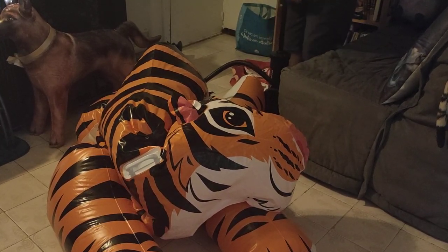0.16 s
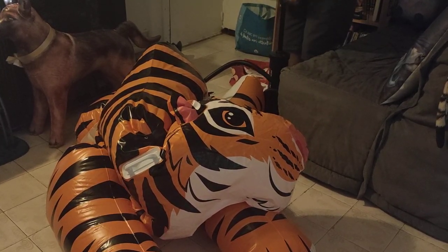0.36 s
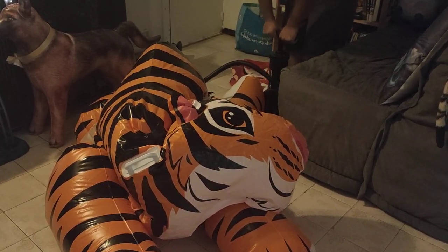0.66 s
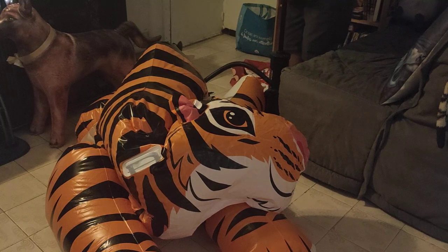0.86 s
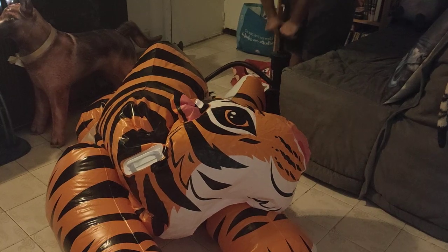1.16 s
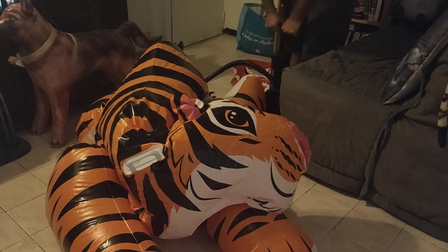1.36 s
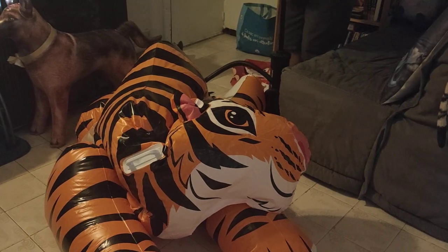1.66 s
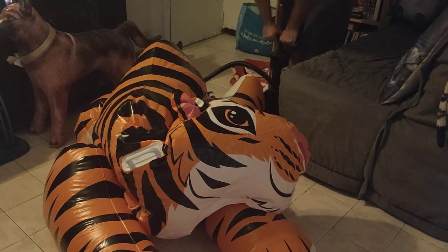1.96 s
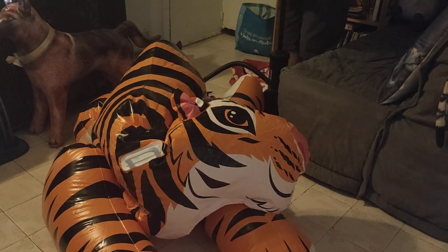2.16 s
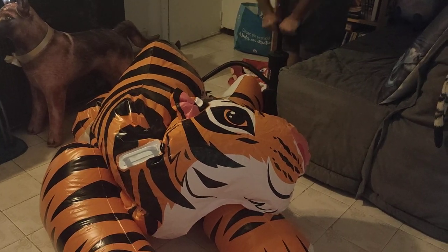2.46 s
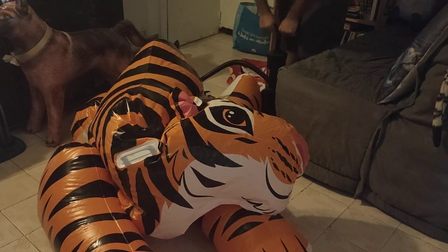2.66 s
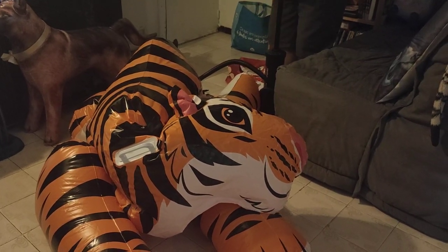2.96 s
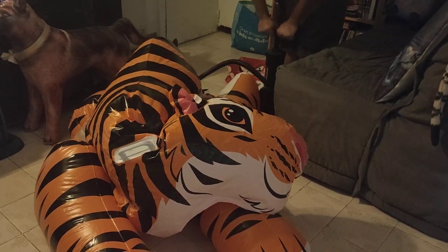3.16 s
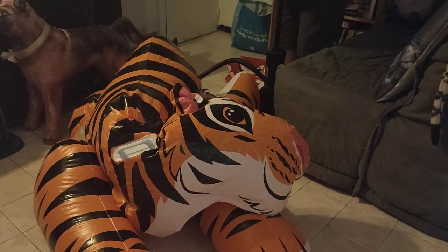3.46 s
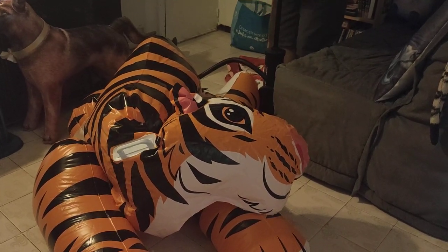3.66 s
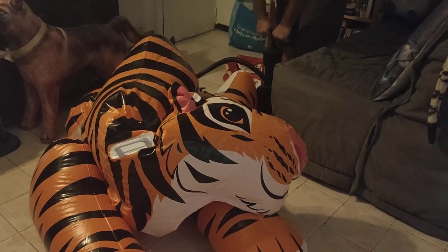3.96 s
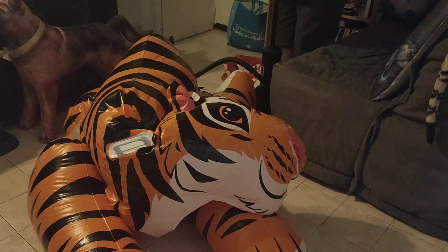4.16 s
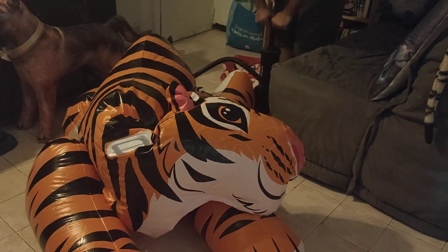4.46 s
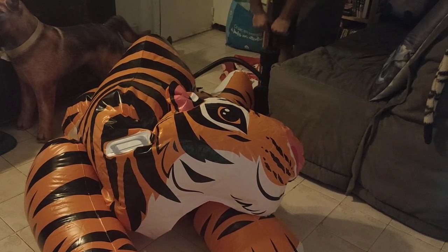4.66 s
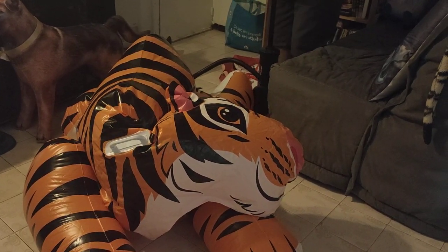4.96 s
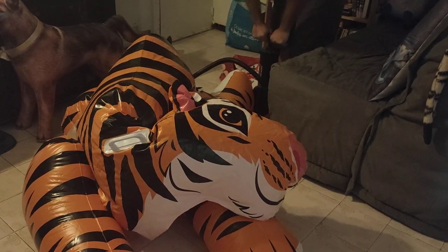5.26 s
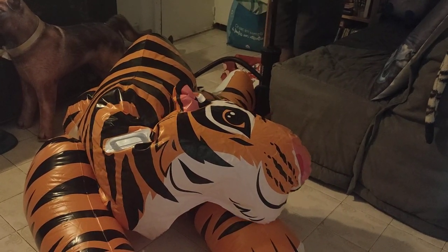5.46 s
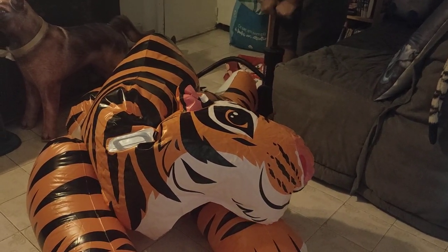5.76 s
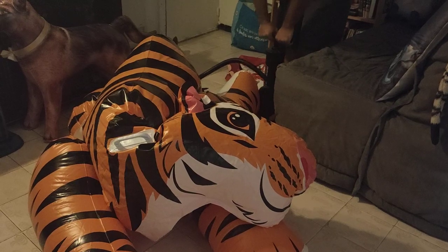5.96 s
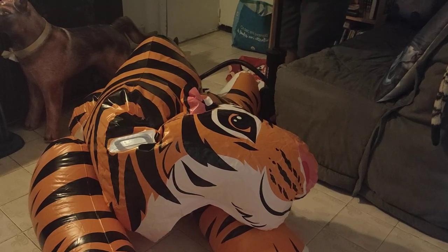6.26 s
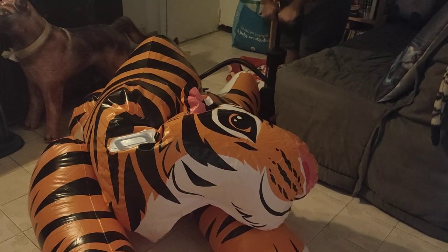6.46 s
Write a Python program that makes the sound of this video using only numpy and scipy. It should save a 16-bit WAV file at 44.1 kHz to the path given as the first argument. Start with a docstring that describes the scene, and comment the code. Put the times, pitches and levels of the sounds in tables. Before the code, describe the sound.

Inside a small tiled room with faint, steady air noise, a double-action hand pump blows up a large vinyl pool toy. The sound opens mid-push, with a weaker pull from about 0.1 s. New pushes follow at about 0.4, 1.1, 1.7, 2.4, 3.0, 3.7, 4.4, 5.0, 5.7 and 6.4 s, each lasting a little under half a second, the last cut off at the end. Every push starts with a small grainy plastic scuff, swells into bright, rasping hiss with hollow hose resonance, and finishes with a soft, dull bump. Pulls between them are quieter and breathier, with a thin airy near-whistle at their fastest, clearest around 0.9 s. In both directions a fluttering valve gives a hoarse, wavering mid-pitched hoot, slightly flat at first, then closes. The rhythm stays even; stereo pickup is close, with short room reflections.

```python
"""A small tiled room, its air faintly audible throughout, heard on two microphone ports: a double-action floor pump
fills a vinyl pool toy at about one and a half full strokes a second, from mid-push to a last push cut off by the end.
Each push starts with a grainy scuff of the shaft; air noise swells through barrel and hose and a fluttering valve flap
hoots hoarsely until it shuts; a damped low sine is the soft bump of the piston at the bottom.
Each pull then rushes more weakly, with the hoot again and a breathy near-whistle of filtered noise at its fastest."""
import sys
import numpy as np
from scipy import signal
from scipy.fft import rfft, irfft
from scipy.io import wavfile

SR = 44100
rng = np.random.default_rng(int(sys.argv[2]) if len(sys.argv) > 2 else 0)


def transcribe(u):
    """Save the signal u as a 16-bit wav file named by the first command-line argument.

    u: samples, shape (n,) or (channels, n), limited to [-1, 1]; the rate is SR.
    q: integer samples, one column per channel.
    """
    v = np.clip(np.atleast_2d(u).T, -1, 1)
    q = np.round(v * 32767).astype(np.int16)
    wavfile.write(sys.argv[1], SR, q)


N = 291501
T = np.arange(N) / SR
FREQS = np.maximum(np.arange(N // 2 + 1) * SR / N, 1)
LEFT_RIGHT = np.array([[1], [-1]])  # signs that set the two ports apart

# handle pushed down: start t/s, length t/s, peak flow level/dB, scuff at the top relative level/dB,
# bump at the bottom relative level/dB
PUSH_STROKES = [(-.27, 0.44, -21, -40, -42), (0.381, 0.45, -21, -36.5, -45), (1.061, 0.43, -21, -47, -44),
                (1.726, 0.43, -20.5, -44, -44), (2.369, 0.43, -21, -38, -47),
                (3.03, .44, -21, -38.5, -43.5), (3.713, 0.43, -21.5, -51, -49),
                (4.368, 0.44, -21, -39.5, -45), (5.033, 0.44, -21, -37.5, -43),
                (5.708, .449, -21, -40.5, -44), (6.396, 0.41, -21.5, -41.5, -45)]
# handle pulled up: start t/s, length t/s, peak flow level/dB, intake whistle level/dB
PULL_STROKES = [(0.071, 0.442, -25.5, -36), (.740, 0.3925, -26, -29), (1.416, 0.411, -26.5, -33.5),
                (2.070, 0.411, -26, -41), (2.719, 0.417, -26, -32.5), (3.384, 0.406, -26.5, -41),
                (4.075, 0.397, -26, -35), (4.736, 0.39, -25.5, -38), (5.395, 0.43, -26, -37),
                (6.079, .41, -26.5, -37)]


def undb(db):
    """Decibels to gain."""
    return 10 ** (np.asarray(db) / 20)


def unit(x):
    """Scale to rms 1."""
    return x / np.sqrt(np.mean(x ** 2))


def across(hz, values):
    """Join points by straight lines along log frequency."""
    return np.interp(np.log(FREQS), np.log(hz), values)


def shape(x, gain):
    """Filter by a gain for each frequency."""
    return irfft(rfft(x) * gain, N)


def walk(rate_hz):
    """Smooth random motion with rms 1, fading out above rate_hz."""
    return unit(shape(rng.standard_normal(N), np.exp(-(FREQS / rate_hz) ** 2)))


def ring(hz, width_hz):
    """Response of one resonance, gain 1 at its centre."""
    return 1 / (1 + 1j * (FREQS ** 2 - hz ** 2) / (FREQS * width_hz))


def diffuse(apart_hz=800):
    """Noise from all round a room: nearly alike at both ports in the bass, mostly unrelated in the treble."""
    mid, side = rng.standard_normal((2, N))
    apart = 0.005 + 0.75 * (1 - np.exp(-(FREQS / apart_hz) ** 2))
    common = shape(mid, np.sqrt(1 - apart / 2))
    opposed = shape(side, np.sqrt(apart / 2))
    return common + opposed * LEFT_RIGHT


def swell(start, length, power, skew):
    """The piston speeds up and slows down in one smooth arc, 0 to 1 to 0; a skew under 1 peaks early."""
    done = np.clip((T - start) / length, 0, 1)
    return np.abs(np.sin(np.pi * done ** skew)) ** power


def flow(strokes, power, skew, room_t60_s=0.926, room_db=-13):
    """Rush level in dB for one direction: a swell for each stroke, its energy dying away in the room."""
    energy = sum((undb(db) * swell(start, length, power, skew)) ** 2 for start, length, db, *_ in strokes)
    keep = undb(-60 / (room_t60_s * SR)) ** 2  # energy left after one sample
    lingering = signal.lfilter([1 - keep], [1, -keep], energy)
    return 10 * np.log10(energy + undb(room_db) ** 2 * lingering + 1e-12)


def quiet(level_db=-55):
    """Still air of the room: faint steady noise, largely alike at both ports."""
    # spectrum of the still air: f/Hz, relative level/dB
    air_colour = [(25, -5), (70, 6), (150, -6), (300, 33), (1000, -6), (4000, -26), (15000, -26)]
    mid, side = shape(rng.standard_normal((2, N)), undb(across(*np.transpose(air_colour))))
    return undb(level_db) * (unit(mid) + 0.22 * unit(side) * LEFT_RIGHT)


def scuffs(rise_s=0.0013, decay_s=0.041, grain=0.32, level_db=2, after_s=0.0175):
    """A short, grainy rub of the plastic shaft in its collar as each push begins."""
    # spectrum of the rub: f/Hz, relative level/dB
    rub_colour = [(100, -32), (290, 8.5), (600, -3), (1000, 3), (1500, -2), (2400, 6.5), (4000, -9),
                  (6000, -31), (12000, -37)]
    size = np.zeros(N)
    for start, _, _, db, _ in PUSH_STROKES:
        age = np.maximum(T - start - after_s, 0)
        size += undb(db + level_db) * (1 - np.exp(-age / rise_s)) * np.exp(-age / decay_s)
    rough = diffuse() * np.exp(grain * walk(200))
    return size * unit(shape(rough, undb(across(*np.transpose(rub_colour)))))


def bumps(hz=150, decay_s=0.018, level_db=8, before_end_s=0.073):
    """A soft, low knock of the piston on its seat as each push runs out, cushioned by the trapped air."""
    out = np.zeros(N)
    detunes = 1 + 0.037 * rng.standard_normal(len(PUSH_STROKES))
    for (start, length, _, _, db), detune in zip(PUSH_STROKES, detunes):
        age = np.maximum(T - (start + length - before_end_s), 0)
        cushion = 1 - np.exp(-(age / 0.012) ** 2)  # softens the onset
        knock = np.exp(-age / decay_s) * np.sin(2 * np.pi * hz * detune * age)
        out += undb(db + level_db) * cushion * knock
    return out


def whistle(hz=2275, width_hz=130, power=14, skew=0.74):
    """A breathy near-whistle of resonant noise at the intake holes, only in the fastest part of a pull."""
    size = sum(undb(db) * swell(start, length, power, skew) for start, length, _, db in PULL_STROKES)
    return size * unit(shape(diffuse(), ring(hz, width_hz) ** 2))


def valve(flow_db, flap_hz=748, level_db=-33, overtone_db=-26):
    """The flap flutters a little flat at first, sags in weak flow and is partly blown still in strong flow."""
    # resonances of the hose beside the direct sound: f/Hz, width f/Hz, level/dB
    hose_modes = [(648, 18, 3.5), (685.4, 16, 5), (761.7, 8.1, 4)]
    # echoes of the hoot from floor and walls: delay to the left port t/ms, to the right port t/ms, level/dB
    wall_echoes = [(5.73, 8.16, -16.5), (14.27, 11.9, -9), (23.1, 27.6, -6.5), (41.07, 49, -14.5)]
    opens_after_s, open_s, tail_s = 0.088, 0.0041, 0.024
    start_flat_hz, start_s = 42, 0.026
    sag_hz_per_db, jitter_hz = 0.6, 23
    shake, choke_db_per_db = 0.24, 0.5

    size, flat = np.zeros(N), np.zeros(N)
    # the flap falls shut after this share of a push or pull
    for strokes, shut_share in ((PUSH_STROKES, 0.75), (PULL_STROKES, 0.58)):
        for start, length, *_ in strokes:
            opens, shuts = start + opens_after_s, start + shut_share * length
            opening = np.clip((T - opens) / open_s, 0, 1)
            size += opening * np.exp(-np.maximum(T - shuts, 0) / tail_s)
            flat += (T >= opens) * np.exp(-np.abs(T - opens) / start_s)

    sag = sag_hz_per_db * np.minimum(flow_db + 25, 0)  # below -25 dB of flow
    hz = flap_hz - start_flat_hz * flat + sag + jitter_hz * walk(137)
    phase = 2 * np.pi * np.cumsum(hz) / SR
    choke = undb(-choke_db_per_db * np.maximum(flow_db + 28, 0))  # above -28 dB of flow
    size *= np.exp(shake * walk(130)) * choke
    overtones = np.sin(2 * phase) + np.sin(3 * phase)
    flap = size * (np.sin(phase) + undb(overtone_db) * overtones)

    hose = 1 + sum(undb(db) * ring(f, width) for f, width, db in hose_modes)
    # the unsteady tone beats against its own echoes
    echoes = 1
    for left_ms, right_ms, db in wall_echoes:
        delays_s = np.array([[left_ms], [right_ms]]) / 1000
        echoes = echoes + undb(db) * np.exp(-2j * np.pi * FREQS * delays_s)
    return undb(level_db) * np.array([unit(port) for port in shape(flap, hose * echoes)])


def rush(flow_db, column, trim_db, low_slope, mid_slope, top_slope, rasp):
    """Turbulence of one direction (column 1 push, 2 pull): its colour changes as the air speeds up."""
    # colour of the rushing air: f/Hz, push relative level/dB, pull relative level/dB
    air_colour = np.array([(81, -48, -37), (153.5, -18, -17), (247, -11, -5.5), (418, -12, -5),
                           (540, -6.5, -3), (1080, -7, -3), (1717, -12, -11), (2410, -4, -0.5),
                           (3580, -8.5, -7), (5180, 1, 3), (6650, -3, -2.5), (7300, 2, 0),
                           (8970, -7.5, -10), (13500, -12.5, -11.5), (15500, -8.5, -6)])
    # air resonances of barrel and hose: f/Hz, width f/Hz, push lift level/dB, pull lift level/dB
    pipe_modes = [(226, 8.7, 6.5, -6.5), (272, 26, 8, 0.5), (459.2, 15, 13.5, 12.5), (1028, 24, 9.5, 3.5),
                  (1100, 12, 7.5, -7), (1380, 44, 3, 6), (2280, 106, 2.5, 2)]
    full_db = -24  # flow at which all bands keep their table balance

    colour_db = across(air_colour[:, 0], air_colour[:, column])
    for mode in pipe_modes:
        colour_db = colour_db + mode[column + 1] * np.abs(ring(mode[0], mode[1])) ** 2
    colour = undb(colour_db)
    # the hiss from 3 to 9 kHz sets the reference level
    colour /= np.sqrt(np.mean(colour ** 2 * (FREQS > 3000) * (FREQS < 9000)))
    air = rfft(diffuse() * np.exp(rasp * walk(350))) * colour

    # bass, middle, hiss and top each grow at their own pace (dB per dB of flow)
    centres_hz = [500, 1800, 6000, 11000]
    slopes = (low_slope, mid_slope, 1, top_slope)
    out = 0
    for share, slope in zip(np.eye(len(centres_hz)), slopes):
        band = irfft(air * across(centres_hz, share), N)
        out = out + band * undb(full_db + slope * (flow_db - full_db) + trim_db)
    return out


def reflect(x, count=5, early_db=2):
    """Dense short reflections, mixed in slowly and randomly varying shares, roughen the colour of the treble."""
    age = T[:SR // 30]
    weights = np.array([walk(2.8) for _ in range(count)])
    weights /= np.sqrt(np.sum(weights ** 2, axis=0))
    near = 0
    for weight in weights:
        response = rng.standard_normal((2, len(age))) * np.exp(-age / 0.007)
        response /= np.sqrt(np.sum(response ** 2, axis=1, keepdims=True))
        near = near + weight * signal.oaconvolve(x, response, axes=1)[:, :N]
    # long waves bend round small things instead of bouncing off them
    share = undb(early_db) * FREQS ** 2 / (FREQS ** 2 + 2000 ** 2)
    total = np.sqrt(1 + share ** 2)
    return shape(x, 1 / total) + shape(near, share / total)


def scene():
    """Pushes and pulls each drive a rush; the valve opens each stroke, the stronger flow bending and choking its hoot."""
    push_db = flow(PUSH_STROKES, power=3.3, skew=1.005)
    pull_db = flow(PULL_STROKES, power=3.7, skew=0.78)
    down = rush(push_db, column=1, trim_db=3.0, low_slope=0.8, mid_slope=0.67, top_slope=1.15, rasp=0.098)
    up = rush(pull_db, column=2, trim_db=2.5, low_slope=1.24, mid_slope=0.86, top_slope=1.13, rasp=0.056)
    hoot = valve(np.maximum(push_db, pull_db))
    return quiet() + scuffs() + bumps() + whistle() + hoot + reflect(down + up)


def record(dry, top_hz=15750):
    """Each microphone port colours the sound in its own way; the top is cut steeply."""
    # colour of the two ports: f/Hz, left minus right level/dB
    port_colour = [(130, -1), (420, 2), (750, 2.5), (1600, 0), (2250, 7.5), (3600, 1), (5600, 5.5),
                   (6500, 1.5), (7300, -21), (8100, -9.5), (9500, -9.5), (11500, 2), (13500, -3.5),
                   (15500, 16)]
    gains = undb(across(*np.transpose(port_colour)) * LEFT_RIGHT / 2)
    # both ports together keep the same power at every frequency
    coloured = shape(dry, gains / np.sqrt(np.mean(gains ** 2, axis=0)))
    return signal.sosfilt(signal.ellip(10, 0.2, 80, top_hz, fs=SR, output="sos"), coloured)


dry = scene()
out = record(dry)
transcribe(out)
```